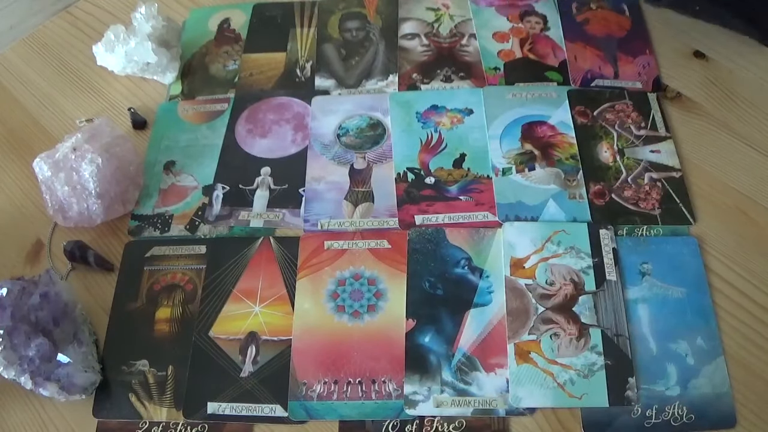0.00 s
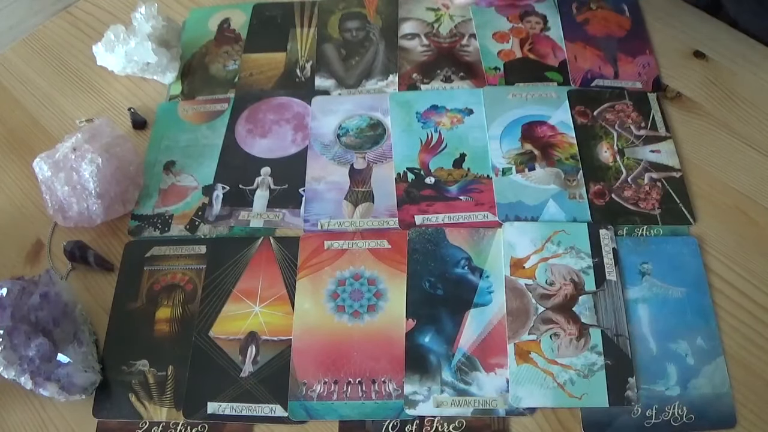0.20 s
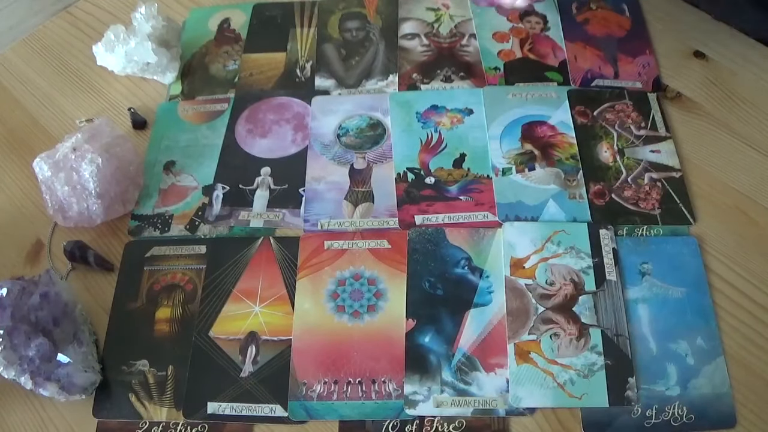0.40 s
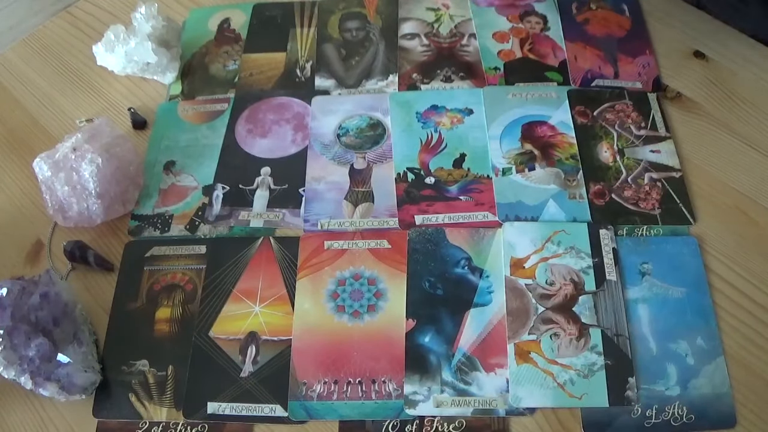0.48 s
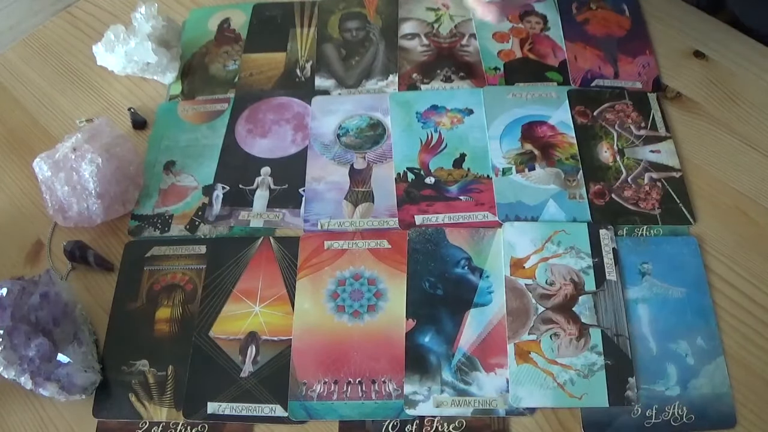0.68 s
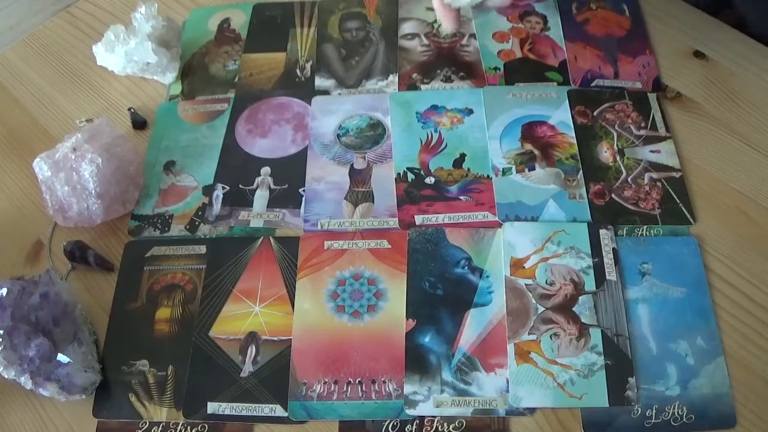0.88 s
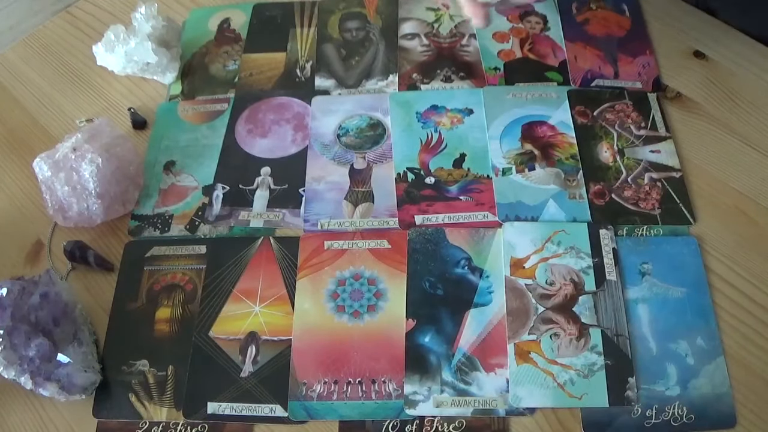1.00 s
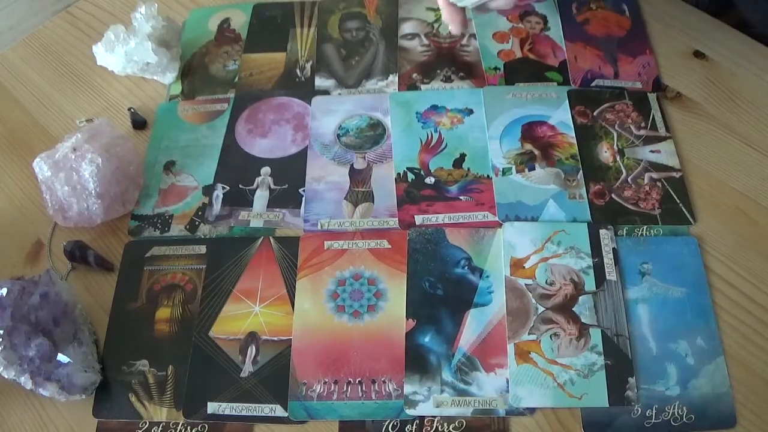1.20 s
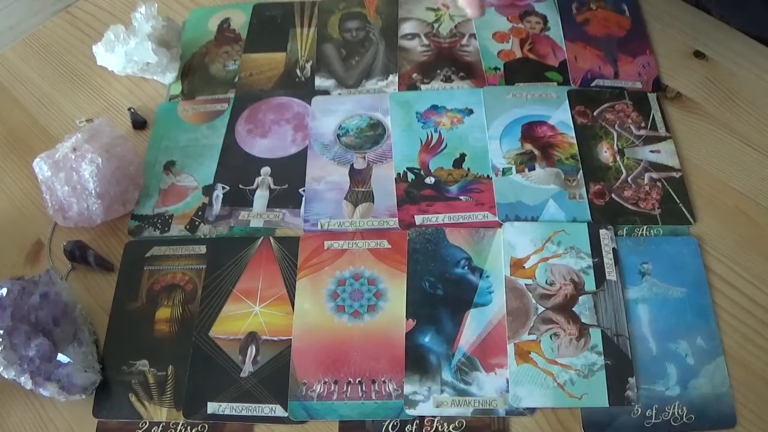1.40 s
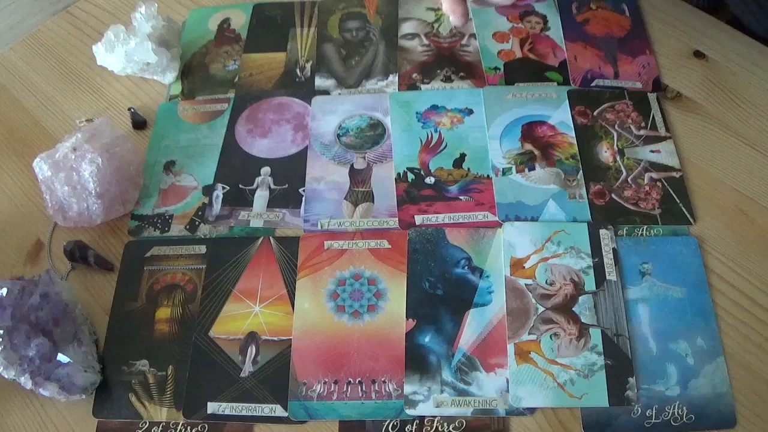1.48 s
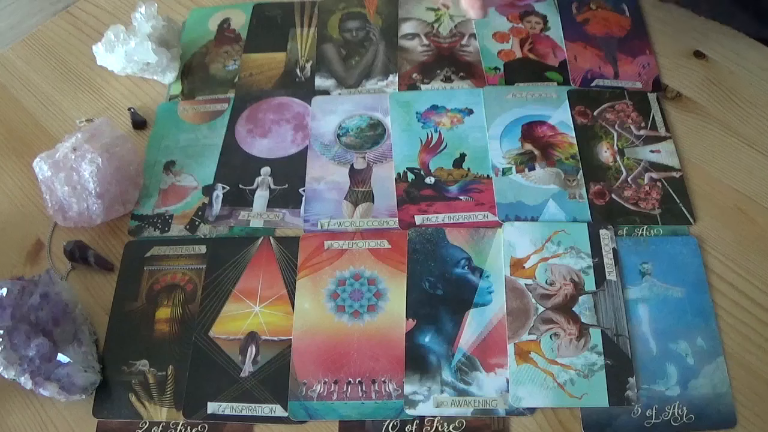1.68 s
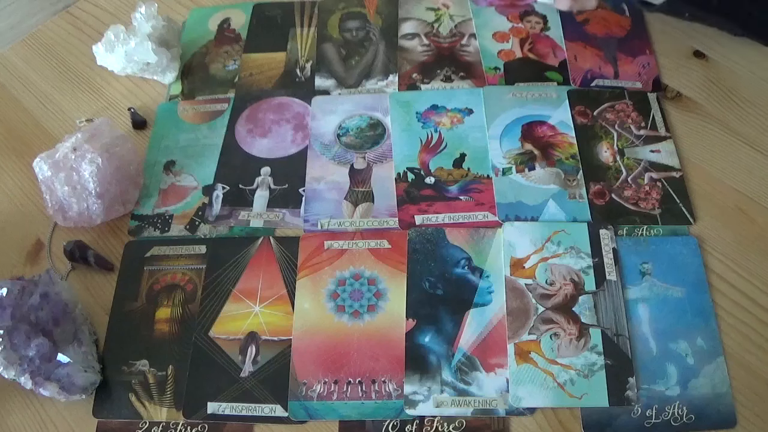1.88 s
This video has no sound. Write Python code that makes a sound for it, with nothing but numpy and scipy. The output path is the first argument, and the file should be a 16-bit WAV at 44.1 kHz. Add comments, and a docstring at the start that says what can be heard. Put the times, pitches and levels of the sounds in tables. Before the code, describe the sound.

A card packet is shuffled in quick, regular strokes, each a short hiss, crisp snap and dull pat; the first is loudest, later ones weaken, over quiet room air with low hum and short reverberation.

```python
"""Playing cards are shuffled by hand over a wooden table in a small room, about three strokes a second.
Air noise and a low sine hum run throughout. A faint snap opens; then, in each stroke, rubbing cards hiss (grains
and noise), their edges snap free (noise cracks, ringing card modes) and the packet pats the deck (noise knocks).
One wall echo and a short diffuse tail answer them. From the third stroke the table rumbles faintly under the arms
(swells of low noise). A last quiet slide comes after the final stroke."""
import sys
import numpy as np
from scipy import signal
from scipy.fft import rfft, irfft
from scipy.io import wavfile
from scipy.ndimage import uniform_filter1d

SR = 44100
rng = np.random.default_rng(int(sys.argv[2]) if len(sys.argv) > 2 else 0)


def waveform_to_disk(signal):
    """Save audio, clipped to [-1, 1], as 16-bit WAV at the path in sys.argv[1]."""
    frames = np.transpose(np.atleast_2d(signal))
    scaled = np.clip(frames, -1, 1) * 32767
    samples = np.round(scaled).astype(np.int16)
    wavfile.write(sys.argv[1], SR, samples)


N = 83790
TOP_HZ = 11100
SHORT_SAMPLES, LEAD_SAMPLES = 8192, 256  # buffer of a short sound, silence before its onset


def undb(db):
    """Decibels to gain."""
    return 10 ** (np.asarray(db) / 20)


def unit(x):
    """Scale to rms 1."""
    return x / np.sqrt(np.mean(x ** 2) + 1e-18)


def along(points, hz):
    """Read a table on a log-frequency axis."""
    point_hz, value = np.array(points, float).T
    return np.interp(np.log(hz + 1), np.log(point_hz), value)


def bump(hz, centre_hz, octaves, skirt_db):
    """Gain of a broad resonance over a flat skirt."""
    distance = np.log2((hz + 1) / centre_hz) / octaves
    return np.exp(-.5 * distance ** 2) + undb(skirt_db)


def shape(x, gain):
    """Filter by a gain that is a function of frequency."""
    return irfft(rfft(x) * gain(np.fft.rfftfreq(len(x), 1 / SR)), len(x))


def noise(gain):
    """Steady coloured noise of rms 1."""
    return unit(shape(rng.standard_normal(N), gain))


def fade(age, decay_s):
    """Sudden start, exponential decay."""
    return (age >= 0) * np.exp(-np.maximum(age, 0) / decay_s)


def short_time():
    """Time axis of a short sound, 0 at its onset."""
    return (np.arange(SHORT_SAMPLES) - LEAD_SAMPLES) / SR


def place(x, age):
    """Put the onset of a short sound at age 0."""
    return np.interp(age * SR + LEAD_SAMPLES, np.arange(SHORT_SAMPLES), x, left=0, right=0)


def burst(gain, decay_s):
    """A dying burst of noise whose spectrum follows the gain evenly; it starts at rms 1."""
    envelope = fade(short_time(), decay_s)
    raw = rng.standard_normal(SHORT_SAMPLES) * envelope
    power = uniform_filter1d(np.abs(rfft(raw)) ** 2, size=120)
    ripple = np.sqrt(power + 1e-9)
    even = shape(raw, lambda f: gain(f) / ripple)
    return unit(even) * np.sqrt(np.mean(envelope ** 2))


def background(t):
    """Steady room air, partly different on each side, and a low hum of sines."""
    # room air spectrum, relative: pitch_hz, level_db
    air_colour = [(16, -40), (26, -10), (35, 2.5), (55, -1.5), (80, -7), (120, -3), (200, -6.5), (400, -15),
                  (600, -14.5), (850, -11), (1300, -15.5), (2200, -24.5), (4000, -27), (8000, -28.5),
                  (11000, -35.5)]
    # side against mid air: pitch_hz, level_db
    side_colour = [(40, -33), (130, -23.5), (300, -7.5), (1000, -5), (10000, -5)]
    # hum partials: pitch_hz, rms_level_db
    hum_partials = [(100.5, -61), (150.5, -64), (301, -66.5), (500, -68.5)]
    air_db = -54  # rms of the mid
    air_gain = lambda f: undb(along(air_colour, f))
    mid = noise(air_gain)
    side = shape(noise(air_gain), lambda f: undb(along(side_colour, f)))
    hum = 0
    for hz, db in hum_partials:
        hum = hum + np.sqrt(2) * undb(db) * np.sin(2 * np.pi * (hz * t + rng.random()))
    return undb(air_db) * np.array([mid + side, mid - side]) + hum


def room_tail(t):
    """Diffuse echoes that build up and die away, each band at its own rate."""
    # reverberation time: pitch_hz, t60_s
    band_t60 = [(150, 0.39), (400, 0.7), (900, 0.67), (2300, 0.59), (5000, 0.52), (10000, 0.5)]
    # tail colour: pitch_hz, level_db
    tail_colour = [(100, 11), (400, 4), (800, 7), (1500, 2.5), (2450, 3), (3400, -3), (5300, -3),
                   (8000, -4), (11000, -0.5)]
    build_s = 0.0098
    white, tail = rng.standard_normal(N), 0
    for hz, t60_s in band_t60:
        band = [(f, float(f == hz)) for f, _ in band_t60]
        tail = tail + shape(white, lambda f: along(band, f)) * np.exp(-np.log(1000) * t / t60_s)
    tail = tail * (1 - np.exp(-(t / build_s) ** 2))
    tail = unit(tail) / np.sqrt(N)  # energy 1
    return shape(tail, lambda f: undb(along(tail_colour, f)))[:SR]


def wall_echo(t):
    """One early echo off a near wall: a very short noise burst of energy 1."""
    delay_s, spread_s = .0088, 0.0009
    echo = place(burst(np.ones_like, spread_s), t - delay_s)
    return unit(echo)[:SR] / np.sqrt(N)


def room(x, t):
    """Convolve with a wall echo, different on each side, and the tail of the room."""
    tail_db, side_db, wall_db = -7, -8, -10  # side is relative to the mid tail
    mid = undb(tail_db) * room_tail(t)
    side = undb(tail_db + side_db) * room_tail(t)
    ears = []
    for tail in (mid + side, mid - side):
        response = tail + undb(wall_db) * wall_echo(t)
        ears.append(signal.fftconvolve(x, response)[:N])
    return np.array(ears)


def table(t):
    """The table top's low resonance, as noise swelling softly under the arms."""
    # rumbles: centre_s, level_db, half_length_s (Gaussian sigma)
    rumbles = [(0.79, -51, 0.028), (0.895, -52.5, 0.036), (0.97, -48.5, 0.026), (1.095, -55.5, .04),
               (1.318, -51.5, 0.022), (1.418, -51.5, 0.027), (1.545, -59.5, 0.044)]
    body_hz, body_octaves = 159, 0.31
    pressure = sum(undb(db) * np.exp(-.5 * ((t - centre_s) / half_s) ** 2) for centre_s, db, half_s in rumbles)
    return pressure * noise(lambda f: bump(f, body_hz, body_octaves, skirt_db=-74))


def pats(t):
    """The packet lands flat on the deck with a dull knock, pitched by how it is held."""
    # pats: start_s, level_db, decay_s, body_hz
    landings = [(0.2416, -31, 0.0055, 1010), (0.5132, -31, 0.0037, 1610), (0.57, -32, .004, 1900),
                (0.5797, -28, 0.0038, 2450), (0.5917, -30, 0.0046, 940), (0.8590, -37.5, 0.004, 1720),
                (0.8690, -38.5, .018, 372), (1.1681, -30.5, 0.0024, 1790), (1.1790, -42.5, 0.016, 634),
                (1.4664, -37.5, 0.00099, 1140), (1.4709, -34.5, 0.0023, 800)]
    # knock colour: pitch_hz, level_db
    knock_colour = [(80, -15), (180, -6), (330, 3.5), (600, -2), (1000, -4.5), (1700, 0.5), (2800, -5.5),
                    (6000, -13)]
    body_octaves, skirt_db = 0.17, -3
    out = np.zeros(N)
    for start_s, db, decay_s, body_hz in landings:
        gain = lambda f: undb(along(knock_colour, f)) * bump(f, body_hz, body_octaves, skirt_db)
        out += place(undb(db) * burst(gain, decay_s), t - start_s)
    return out


def paper(hz):
    """Gain of the broad colour of card stock."""
    # card stock colour: pitch_hz, level_db
    stock_colour = [(100, -20), (400, -11.5), (900, 2), (2000, -1), (3200, 2.5), (5000, -3), (8000, 1),
                    (9500, 1), (11000, -6.5)]
    return undb(along(stock_colour, hz)) * (hz < TOP_HZ)


def slides(t):
    """Card faces rub: dense tiny catches over a hiss, its level sloping up or down until the card is free."""
    # slides: start_s, end_s, level_db (halfway), swell_db (start to end), bright_hz (resonance centre)
    rubs = [(0.010, 0.071, -52.5, -7, 5260), (0.074, 0.233, -49, 13, 8900),
            (0.215, 0.228, -35.5, 9.5, 4300), (0.509, 0.565, -40, 2, 7500),
            (0.550, 0.588, -36.5, 0.5, 7740), (0.787, 0.853, -54.5, 15, 8500), (0.855, 0.889, -41, 1, 7530),
            (1.085, 1.17, -56, 13, 9100), (1.164, 1.175, -42.5, -2, 7100), (1.413, 1.426, -48.5, 10, 9700),
            (1.435, 1.442, -39, -3, 9800), (1.444, 1.459, -53, 5, 8000), (1.455, 1.480, -44, -6, 7650),
            (1.481, 1.533, -57.5, -7, 4430), (1.794, 1.893, -58.5, -0.5, 6600)]
    catches_per_s, catch_spread_db, hiss_db = 3000, 2, -1.5  # hiss against catches
    octaves, skirt_db = 0.6, -7
    attack_share, release_s = 0.084, 0.0033  # attack as a share of the slide
    out, age = np.zeros(N), short_time()
    for start_s, end_s, db, swell_db, bright_hz in rubs:
        length_s = end_s - start_s
        signs = rng.choice([-1, 1], SHORT_SAMPLES)
        sizes = signs * undb(catch_spread_db * np.minimum(rng.exponential(size=SHORT_SAMPLES), 4))
        catches = (rng.random(SHORT_SAMPLES) < catches_per_s / SR) * sizes
        raw = unit(catches) + undb(hiss_db) * rng.standard_normal(SHORT_SAMPLES)
        rub = shape(raw, lambda f: bump(f, bright_hz, octaves, skirt_db) * paper(f))
        progress = np.clip(age / length_s, 0, 1)
        attack = np.clip(progress / attack_share, 0, 1)
        contact = attack * np.exp(-np.maximum(age - length_s, 0) / release_s)
        swell = undb(db + swell_db * (progress - 0.5))
        out += place(unit(rub) * contact * swell, t - start_s)
    return out


def snaps(t):
    """Each edge lets go with a crack and rings the card for a few milliseconds."""
    # snaps: start_s, level_db (of the sum, before halving), bright_hz (resonance centre), width_octaves,
    # ring_db (against the crack), crack_decay_s
    releases = [(0.0177, -38, 1770, .3, 8, 0.0066), (0.2323, -3.5, 4120, 0.19, -2.5, 0.00042),
                (0.2399, -12.5, 5560, .7, -11, 0.0015), (0.2402, -8.5, 4940, 1, 2, 0.0013),
                (0.5123, -11, 6900, 0.19, -19, 0.00063), (0.5127, -17, 4550, 0.066, -14, .0012),
                (0.571, -19.5, 3870, .7, -13, 0.0012), (0.5755, -20, 6130, 0.49, 2, 0.0008),
                (0.5790, -8, 6100, 0.26, -7.5, 0.00028), (0.5886, -20.5, 6900, 0.31, 7, 0.00051),
                (0.589, -18.5, 7300, 0.5, 4.5, 0.0002), (0.8572, -23.5, 5550, 0.63, -6, 0.00052),
                (0.8710, -23.5, 4300, .15, -3, 0.00066), (0.8723, -25, 8100, 0.19, 5.5, 0.0007),
                (1.1672, -24.5, 3460, 0.53, -0.5, 0.00056), (1.1742, -28.5, 7700, 1.1, -13, 0.00089),
                (1.4380, -30.5, 3270, 0.28, -18, 0.0018), (1.4659, -26, 6060, 1.1, -7, .0008)]
    # modes of a bent card, scattered at each snap: pitch_hz, level_db, t60_s
    card_modes = [(868, -15.5, 0.019), (1128, -18, 0.017), (1602, -12, 0.02), (2546, -6.5, 0.012),
                  (3940, -1.5, 0.0085), (4550, -5.5, 0.0074), (5340, -7.5, 0.012), (6320, -14, 0.013),
                  (7790, -7, 0.011), (9350, -11, .008)]
    skirt_db, mode_scatter = -16.5, .015  # scatter: standard deviation, share of the pitch
    out, age = np.zeros(N), short_time()
    hz, mode_db, t60_s = np.array(card_modes).T[:, :, None]
    modes = undb(mode_db) * fade(age, t60_s / np.log(1000))
    for start_s, db, bright_hz, octaves, ring_db, decay_s in releases:
        tone = lambda f: bump(f, bright_hz, octaves, skirt_db)
        crack = burst(lambda f: tone(f) * paper(f), decay_s)
        bent_hz = hz * (1 + mode_scatter * rng.standard_normal(hz.shape))
        strength = np.sqrt(tone(hz)) * rng.choice([-1, 1], hz.shape)
        ring = np.sum(modes * strength * np.sin(2 * np.pi * bent_hz * age), axis=0)
        out += place(undb(db) * (crack + undb(ring_db) * ring) / 2, t - start_s)
    return out


def scene():
    """Cards near the centre, in the room, over table and background."""
    left_over_right_db = -1.4
    pat_room_db, slide_room_db = -3, -2  # the hands shield these from the room more than the snaps
    t = np.arange(N) / SR
    snap, pat, slide = snaps(t), pats(t), slides(t)
    pan = undb(np.array([[left_over_right_db], [-left_over_right_db]]) / 2)
    direct = (snap + pat + slide) * pan
    to_room = snap + undb(pat_room_db) * pat + undb(slide_room_db) * slide
    return direct + room(to_room, t) + table(t) + background(t)


def record(dry):
    """The recorder cuts the top steeply."""
    low_pass = signal.ellip(10, .2, 80, TOP_HZ, fs=SR, output="sos")  # order, ripple dB, stopband dB
    return signal.sosfilt(low_pass, dry)


dry = scene()
out = record(dry)
waveform_to_disk(out)
```